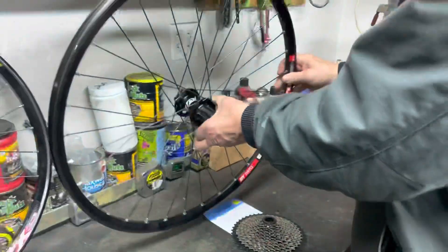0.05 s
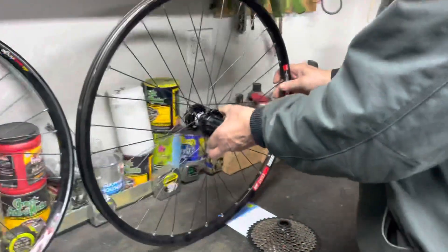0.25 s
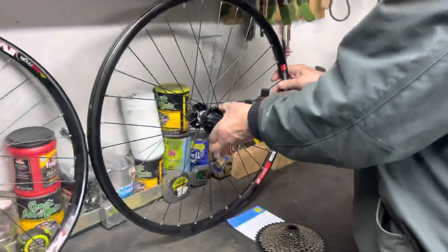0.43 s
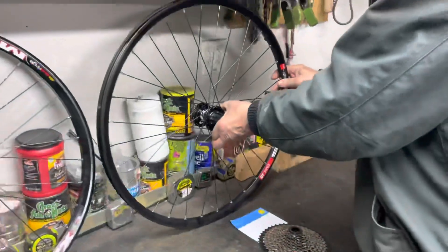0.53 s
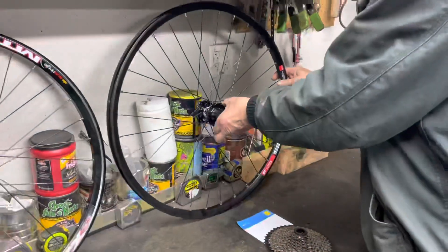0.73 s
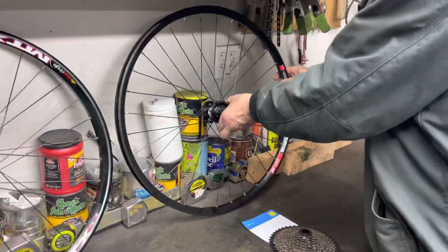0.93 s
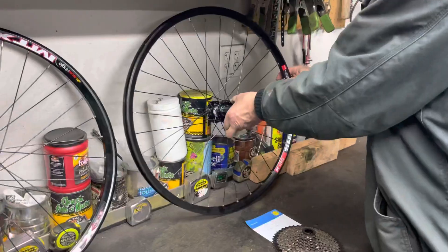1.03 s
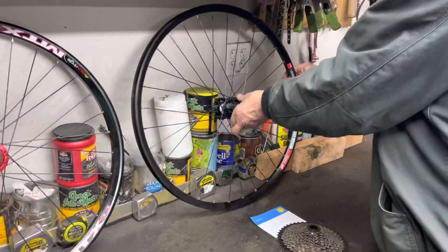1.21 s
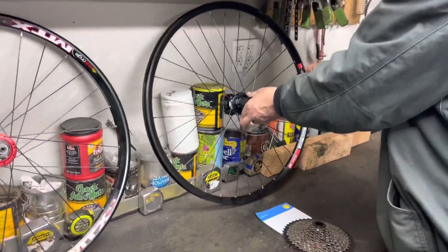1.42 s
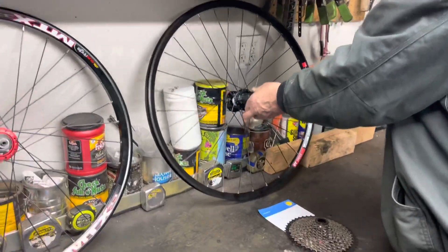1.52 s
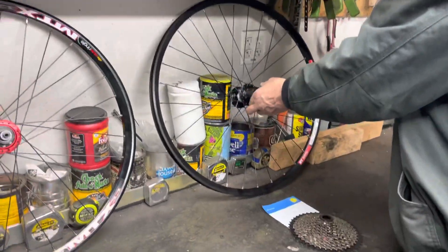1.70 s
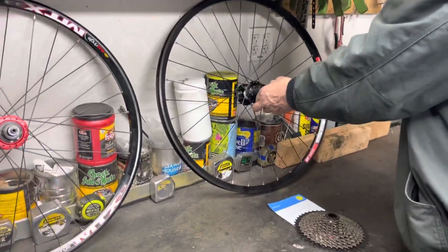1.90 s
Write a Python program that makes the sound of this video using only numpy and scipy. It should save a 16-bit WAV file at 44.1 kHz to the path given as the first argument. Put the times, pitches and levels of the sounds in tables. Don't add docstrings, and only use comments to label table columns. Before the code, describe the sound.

A spoked wheel rim knocks and drags on a booming benchtop, with metallic ticks and light later bumps

```python
import sys
import numpy as np
from scipy import signal
from scipy.fft import rfft, irfft, next_fast_len
from scipy.io import wavfile
from scipy.ndimage import uniform_filter1d, map_coordinates

SR = 44100
rng = np.random.default_rng(int(sys.argv[2]) if len(sys.argv) > 2 else 0)


def file_out(sig):
    cols = np.atleast_2d(sig).T
    lim = np.clip(cols, -1, 1)
    pcm = np.round(lim * 32767).astype(np.int16)
    wavfile.write(sys.argv[1], SR, pcm)


def elevation(decibels):
    levels = np.asarray(decibels, float)
    return 10 ** (levels / 20)


N = 85995

# start in seconds, peak level in dB, boom pitch in Hz, clack over the boom in dB.
THUDS = [(.2295, -7, 127.3, -16), (.2376, -9, 122, -22), (.235, -19.5, 204, 0.5),
         (.5465, -14.5, 126, -16.5), (.5545, -26, 126, -21.5), (.566, -26, 161, -17.5),
         (.600, -36, 140.4, -3), (.624, -29.5, 157, -10), (.645, -30, 94, -20.5), (.676, -25.5, 135.7, -11),
         (.700, -25.5, 113.2, -15), (.730, -32, 114.7, -23), (.764, -31, 129.6, -19.5),
         (.805, -47, 110, -10), (.85, -53, 86, -0.5), (.922, -27, 110.4, -26.5), (.970, -27.5, 147, -15),
         (.986, -29.5, 111, -23), (1.015, -33, 54, -22), (1.405, -44.5, 123, -25),
         (1.461, -30.5, 121.5, -40), (1.512, -33.5, 104.5, -36), (1.595, -44, 188, 2.5),
         (1.609, -28.5, 96.6, -8), (.47, -47, 87.5, -31)]
# pitch in Hz, level over the boom in dB, time to fall 60 dB in seconds.
BENCH_MODES = [(57.5, -22, 0.53), (201.8, -5.5, 0.093), (264.3, -8.5, 0.16), (318, -22, 0.33),
               (409.4, -12, 0.15), (620, -23.5, 0.056), (903, -25.5, 0.14), (965.4, -26, 0.14),
               (1572, -27, 0.091)]
# frequency in Hz, level in dB per Hz.
CLACK_COLOUR = [(150, -2.5), (400, -1), (500, -11.5), (950, -16), (1600, -18.5), (4000, -35.5),
                (13500, -51.5), (14300, -68)]
# frequency in Hz, time to fall 60 dB in seconds.
CLACK_FADE = [(500, 0.2), (2000, 0.16), (8000, 0.23)]
# start in seconds, peak level in dB, time to fall 60 dB in seconds,
# tilt in dB per octave, ringing pitch in Hz.
TICKS = [(0.088, -51.5, 0.083, -3.5, 3900), (.544, -31.5, 0.12, 9, 6220), (0.593, -31.5, 0.036, 6.5, 3370),
         (0.63, -31.5, 0.078, -1, 4430), (0.718, -33.5, 0.041, 7.5, 9700), (.58, -37, 0.07, -2, 8500),
         (.898, -28.5, 0.077, 5, 13500), (0.901, -35.5, 0.054, 3.5, 3800), (1.510, -44.5, 0.2, 0.5, 1930),
         (1.592, -33.5, 0.18, -5, 3890), (1.863, -64, 0.0089, 10.5, 12000), (1.941, -59.5, 0.24, 5, 3290),
         (1.591, -37.5, 0.15, 7, 5340), (1.886, -65, .15, -5, 2700)]
# start in seconds, peak level in dB, time to fall 60 dB in seconds,
# tilt in dB per octave.
SCUFFS = [(.685, -40.5, .12, 3), (.765, -46.5, .15, 4.5), (.875, -50.5, 0.17, 3.5),
          (1.466, -50, 0.21, -0.5), (1.521, -46, 0.11, 2.5), (1.632, -47.5, .1, 1.5),
          (0.216, -40.5, 0.12, -8), (1.347, -55.5, 0.19, 2.5), (1.403, -52.5, 0.57, -1),
          (1.451, -46, 0.14, 3.5), (.81, -52, 0.138, -6), (.958, -43, 0.18, 3)]
# pitch in Hz, level in dB, time to fall 60 dB in seconds.
TAP = [(1730, 2, .09), (2560, -14, .07), (3370, -3, .07), (1200, -5, .06)]
# time in seconds, pressure in dB.
STROKES = [
    [(0.543, -55.5), (0.59, -48), (0.724, -52.5), (0.798, -54.5), (0.868, -58), (0.908, -55),
     (1.012, -59.5), (1.07, -75), (1.12, -93)],
    [(1.27, -92.5), (1.396, -69), (1.47, -60), (1.503, -65), (1.522, -64), (1.576, -69), (1.704, -81),
     (1.78, -106)],
]
# frequency in Hz, level in dB per Hz.
GRIT = [(200, -18), (500, 2), (1800, -10.5), (4000, -14.5), (7000, -21.5), (9500, -13.5), (13500, -27),
        (14300, -40.5)]
# pitch in Hz, width in Hz, level over the grit in dB.
RIM = [(960, 26, -19.5), (1308, 9.1, 14.5), (1772, 60, 9.5), (1943, 11.8, 15.5), (2530, 40, 12),
       (3097, 55, 13.5), (3800, 410, 5), (4430, 71, 11.5), (4930, 55, 11.5), (6220, 27, 17), (6880, 160, 7),
       (12000, 280, -1), (15100, 880, 14.5)]
# pitch in Hz, width in Hz, level in dB.
SPOKES = [(8200, 330, -6), (8400, 72, -15), (8900, 26, -27), (9800, 100, -16), (9750, 83, -8),
          (12000, 48, -15.5), (12000, 41, 1), (12800, 92, -3), (13800, 130, 2.5), (13500, 38, -3)]
# frequency in Hz, level in dB per Hz.
SHUDDER = [(15, -41.5), (25, -18.5), (114, -1.5), (174, -2), (221, -37), (267, -5.5), (600, -22),
           (780, -78), (1320, -120)]
# time in seconds, level in dB.
SLEEVE = [(0, -67.5), (.1, -66), (.15, -66.5), (.2, -68.5), (.3, -64), (.45, -59.5), (.54, -57.5),
          (1.0, -79.5), (1.1, -91), (1.33, -81.5), (1.4, -65), (1.7, -66.5), (1.78, -82.5), (1.9, -83.5),
          (1.95, -76)]
# frequency in Hz, level in dB per Hz.
CLOTH = [(250, -11), (550, -11.5), (2200, -16.5), (3200, -22.5), (7000, -31), (12500, -29), (14000, -30.5),
         (14500, -74.5)]
# pitch in Hz, width in Hz, level in dB.
HUM = [(281, 17, -0.5), (343.4, 3.3, 0.5), (424, 8, -3), (480, 5.2, -28)]
# time in seconds, level in dB.
HUM_LEVEL = [(0, -83), (.22, -69.5), (.3, -36.5), (.5, -59.5), (1.0, -55), (1.25, -58.5), (1.3, -71.5),
             (1.45, -61.5), (1.65, -54.5), (1.85, -61), (1.95, -65)]
# time in seconds, level in dB.
LEGS_LEVEL = [(0.0, -73.5), (0.152, -79), (0.342, -55), (0.396, -52.5), (0.862, -56), (0.928, -50),
              (1.188, -60), (1.356, -66.5), (1.634, -41.5), (1.7, -54), (1.84, -59), (1.95, -66.5)]
# frequency in Hz, level in dB per Hz.
LEGS = [(22, -32), (45, 5), (60, 3), (95, 2), (160, -12), (300, -50)]
# frequency in Hz, level in dB per Hz.
HISS = [(400, -28.5), (700, -2), (4500, -17.5), (6500, -19), (12500, -9), (14000, -8.5), (14500, -77)]
# frequency in Hz, time to fall 60 dB in seconds.
SHOP_FADE = [(120, 0.22), (400, 0.32), (2000, 0.37), (10000, 0.13)]
# frequency in Hz, lead in radians.
LEAD = [(30, 0), (1000, .6), (3000, 1.0), (5000, 1.3), (6500, .2), (7900, 2.95), (9200, 3.3), (10500, 4.4),
        (12000, 5.6), (13300, 6.28)]
# frequency in Hz, difference in dB.
LEFT = [(30, -3), (120, 2.5), (700, 3), (3000, -0.05), (7000, 0.3)]
# frequency in Hz, level in dB.
APART = [(40, -16), (300, -12), (1500, -2.5), (5000, -5), (6500, -6.5), (8000, -11), (9400, -22),
         (13500, -29.5)]

BOOM_RISE_S, BOOM_T60_S = 0.0067, 0.077
CLACK_RISE_S, CLACK_EARLY_S = 0.00029, 0.001
TICK_RISE_S, SCUFF_RISE_S = 0.0013, 0.0023
RING_DB, RING_WIDTH = 15, 0.06
TAP_S, TAP_DB = 1.941, -59.5
RIM_DB, RIM_SWING_DB, SPOKE_DB = -3, 4, 14
GRIT_DB, GRIT_SWING_DB, PATCH_DB = 7.5, 2.2, 4
GRAINS_PER_S, GRAIN_DB = 700, -4.5
SHUDDER_DB, SHUDDER_SWING_DB = 9.5, 2.5
HISS_DB, HUM_DB, SHOP_DB = -80.5, -2.9, -14.5
LOW_CUT_HZ, TOP_HZ, FLOOR_TOP_HZ = 23.5, 15900, 14200


def unit(x):
    return x / np.sqrt(np.mean(x ** 2) + 1e-20)


def along(points, hz):
    f, value = np.transpose(points)
    return np.interp(np.log(hz + 1), np.log(f + 1), value)


def curve(rows):
    s, db = np.transpose(rows)
    return elevation(np.interp(np.arange(N) / SR, s, db, left=-150, right=-150))


def wobble(rate):
    knots = rng.standard_normal(int(N * rate / SR) + 4)
    return map_coordinates(knots, [np.arange(N) * rate / SR])


def filtered(x, response):
    n = x.shape[-1]
    size = next_fast_len(n + 8192)
    hz = np.fft.rfftfreq(size, 1 / SR)
    return irfft(rfft(x, size) * response(hz), size)[..., :n]


def noise(spectrum):
    return unit(filtered(rng.standard_normal((2, N)), lambda hz: elevation(along(spectrum, hz))))


def dying(t60s, size):
    hz, t, z = signal.stft(rng.standard_normal((2, size)), SR, nperseg=256)
    t60 = np.abs(along(t60s, hz))[:, None]
    return signal.istft(z * elevation(-60 * t / t60), SR, nperseg=256)[1][:, :size]


def rise(t, seconds):
    return 1 - np.exp(-t / seconds)


def add(out, s, x):
    k = round(s * SR)
    out[..., k:k + x.shape[-1]] += x


def peak(hz, centre_hz, width_hz):
    return 1j * hz * width_hz / (centre_hz ** 2 - hz * hz + 1j * hz * width_hz)


def bench():
    out, t = np.zeros((2, N + SR)), np.arange(SR // 2) / SR
    for s, db, boom_hz, clack_db in THUDS:
        modes = [(boom_hz, 11, BOOM_T60_S)] + BENCH_MODES
        luck = rng.standard_normal((len(modes), 2))
        luck[0] = 0
        ring = 0
        for (hz, level, t60), (level_luck, phase_luck) in zip(modes, luck):
            fade = elevation(level + level_luck - 60 * t / t60)
            ring = ring + fade * np.sin(2 * np.pi * hz * t + 2 * phase_luck)
        clack = filtered(dying(CLACK_FADE, SR // 2), lambda f: elevation(along(CLACK_COLOUR, f)))
        clack *= rise(t, CLACK_RISE_S) ** 2 / np.std(clack[:, :SR // 50])
        add(out[0], s, -elevation(db) * ring * rise(t, BOOM_RISE_S) ** 2)
        add(out, s - CLACK_EARLY_S, elevation(db + clack_db) * clack)
    return out[:, :N]


def hoop():
    return RIM + [(hz, width, db + SPOKE_DB) for hz, width, db in SPOKES]


def rim(hz):
    response = 1
    for centre, width, db in hoop():
        luck_db = RIM_SWING_DB * rng.standard_normal()
        response = response + elevation(db + RIM_DB + luck_db) * peak(hz, centre, width)
    return response


def ticks():
    out, t = np.zeros((2, N + SR)), np.arange(SR // 4) / SR
    for s, db, t60, tilt_db, *ring in TICKS + SCUFFS:
        rise_s = TICK_RISE_S if ring else SCUFF_RISE_S
        burst = rng.standard_normal((2, len(t))) * elevation(-60 * t / t60) * rise(t, rise_s)

        def strike(f):
            colour = elevation(along(GRIT, f) + tilt_db * np.log2(f / 4000 + 0.13))
            return colour * (rim(f) + sum(elevation(RING_DB) * peak(f, hz, RING_WIDTH * hz) for hz in ring))

        burst = filtered(burst, strike)
        add(out, s, elevation(db - 9.0) * burst / np.std(burst[:, :SR // 200]))
    tap = sum(elevation(db - 60 * t / t60) * np.sin(2 * np.pi * hz * t) for hz, db, t60 in TAP)
    add(out[0], TAP_S, elevation(TAP_DB) * tap * rise(t, TICK_RISE_S))
    return out[:, :N]


def patchy(x):
    z = signal.stft(x, nperseg=1024)[2]
    field = uniform_filter1d(rng.standard_normal(z.shape[1:]), size=3, axis=0)
    field = uniform_filter1d(field, size=3, axis=1)
    return signal.istft(z * elevation(PATCH_DB * unit(field)), nperseg=1024)[1][:, :N]


def drag():
    press = curve(STROKES[0]) + curve(STROKES[1])
    draw = rng.random((3, N))
    struck = draw[0] < GRAINS_PER_S / SR
    grains = struck * np.log(draw[1:] + 1e-9) * np.sign(draw[2] - 0.5)
    rough = rng.standard_normal((2, N)) + elevation(GRAIN_DB) * unit(grains)
    rough = patchy(elevation(GRIT_SWING_DB * wobble(110)) * rough)
    rough = filtered(rough, lambda f: elevation(along(GRIT, f)))
    hiss = rough
    for centre, width, db in hoop():
        gain = elevation(db + RIM_DB + RIM_SWING_DB * wobble(24))
        hiss = hiss + gain * filtered(rough, lambda f: peak(f, centre, width))
    shudder = elevation(SHUDDER_DB + SHUDDER_SWING_DB * wobble(29.1)) * noise(SHUDDER)
    return press * (elevation(GRIT_DB) * unit(hiss) + shudder)


def hoop_hum(f):
    return sum(elevation(db) * peak(f, c, w) for c, w, db in HUM) * peak(f, 339, 300) ** 2


def floor():
    cloth = curve(SLEEVE) * elevation(1.9 * wobble(38)) * noise(CLOTH)
    hiss = elevation(HISS_DB + 1.5 * wobble(3.9)) * noise(HISS)
    quiet = filtered(cloth + hiss, lambda f: f < FLOOR_TOP_HZ)
    hum = unit(filtered(rng.standard_normal((2, N)), hoop_hum))
    legs = curve(LEGS_LEVEL) * elevation(4.5 + 2.8 * wobble(35.4)) * noise(LEGS)
    return quiet + curve(HUM_LEVEL) * elevation(HUM_DB) * hum + legs


def shop(x):
    tail = dying(SHOP_FADE, SR // 2)
    late = np.pad(x, (300, 0))[None]
    return signal.fftconvolve(late, tail / np.linalg.norm(tail[0]), axes=1)[:, :N]


def scene():
    hits = bench() + ticks()
    shared, own = hits + drag() + floor() + elevation(SHOP_DB) * shop(hits[0])
    own = filtered(own, lambda f: elevation(along(APART, f)))
    sides = np.array([[1], [-1]])

    def ports(f):
        return elevation(sides * along(LEFT, f) / 2) * np.exp(0.5j * sides * along(LEAD, f))

    return filtered(shared + sides * own, ports)


def top_cut(x):
    return signal.sosfilt(signal.butter(12, 15900, fs=SR, output="sos"), x)


def record(dry):
    mix = filtered(dry, lambda f: (1j * f / (LOW_CUT_HZ + 1j * f)) ** 2 * (f < TOP_HZ))
    return top_cut(mix)


dry = scene()
out = record(dry)
file_out(out)
```